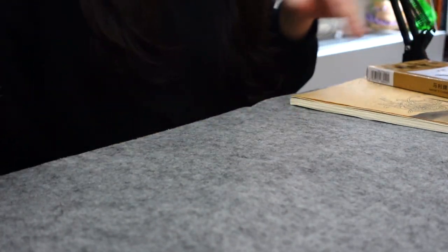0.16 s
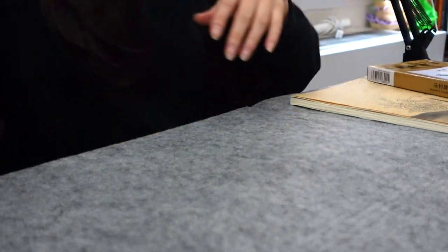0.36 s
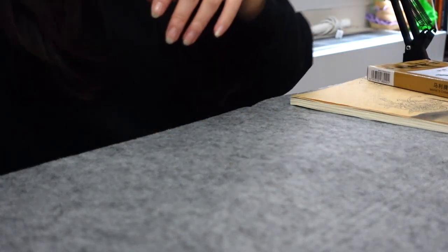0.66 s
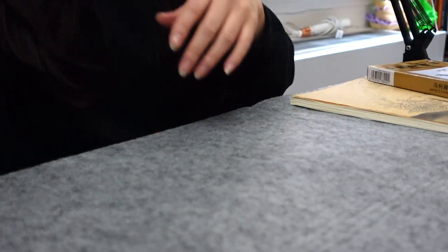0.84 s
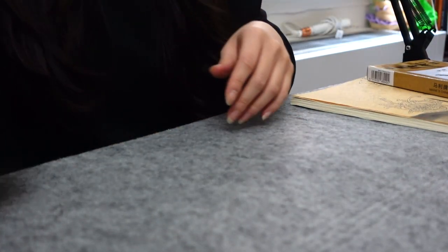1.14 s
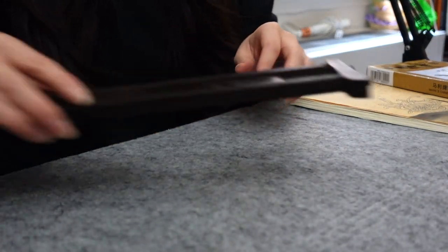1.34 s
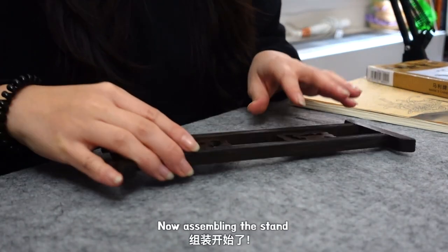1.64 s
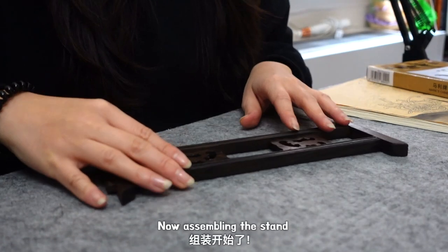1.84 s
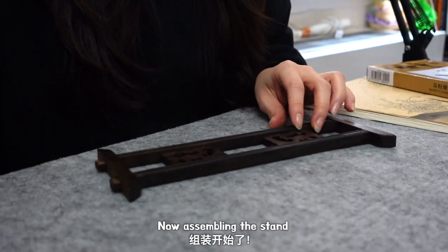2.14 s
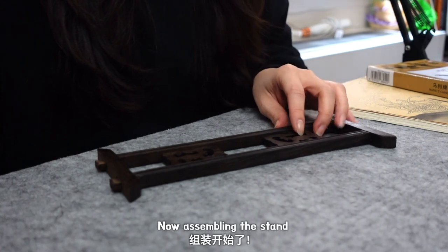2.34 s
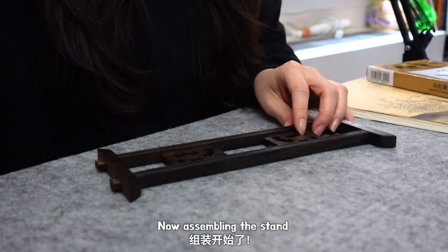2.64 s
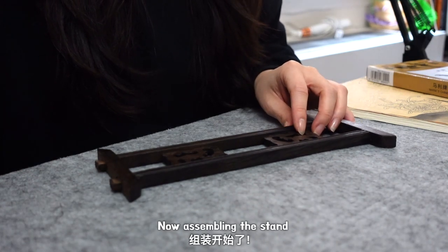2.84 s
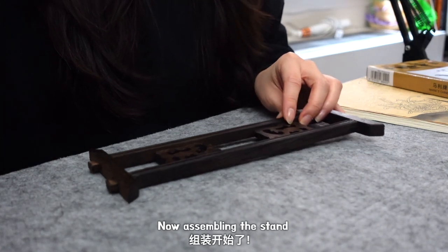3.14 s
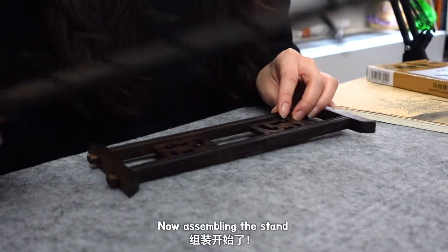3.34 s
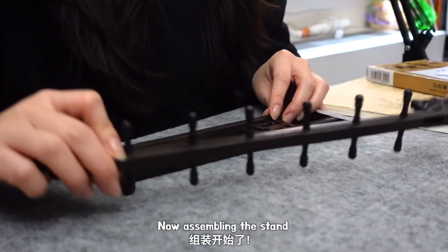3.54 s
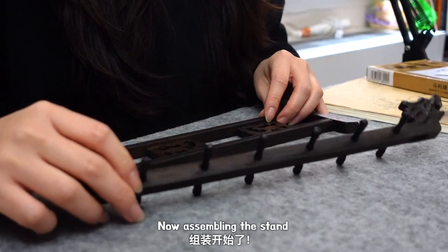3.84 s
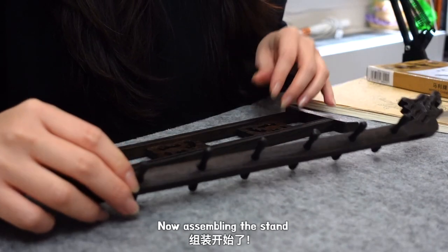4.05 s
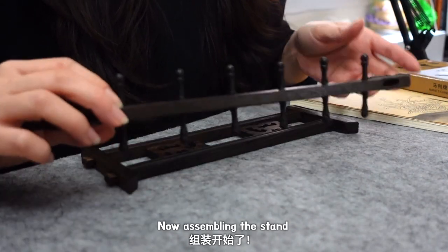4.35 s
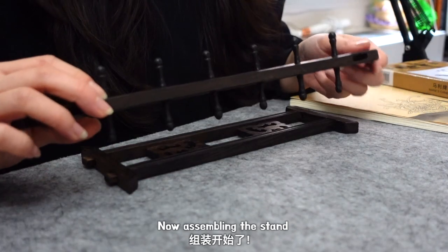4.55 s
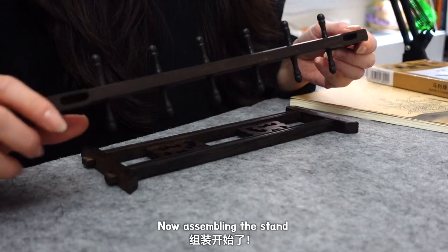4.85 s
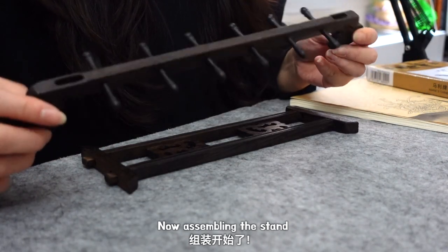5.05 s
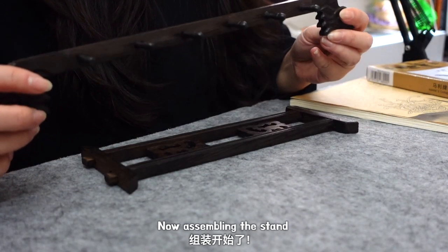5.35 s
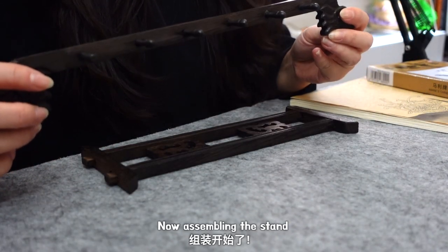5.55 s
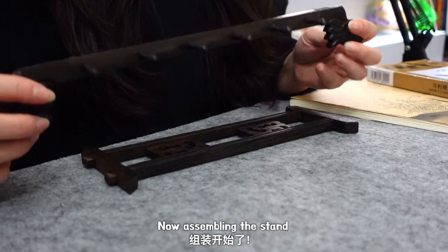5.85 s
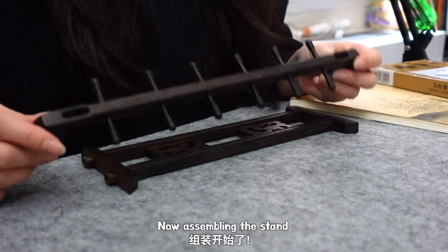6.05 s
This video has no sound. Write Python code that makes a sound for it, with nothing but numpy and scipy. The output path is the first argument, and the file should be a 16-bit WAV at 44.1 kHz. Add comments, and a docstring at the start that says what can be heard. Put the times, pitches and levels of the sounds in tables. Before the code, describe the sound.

Hands move wooden stand pieces on a padded tabletop near a stereo microphone. After a nearly silent start with a small knock on the left, thin wrapping crackles and dry ticks gather, then hard wooden knocks rattle in a quick cluster. Light taps and rustling follow. Later there are only isolated bright clicks and faint skin slips on a wooden bar, over soft low room hum with little echo.

```python
"""Over a quiet room hum a wooden tick is heard, then a pile of small wooden parts clatters aside.
Parts of a small stand are picked up and turned over on a felt-covered table, close to a stereo microphone.
Knocks and shifting parts make the wood ring; random small contacts make the rattle, the crinkle of
wrapping and the rub of fingers on a bar. Filtered noise and wavering tones make the room and its hum."""
import sys
import numpy as np
from scipy import signal
from scipy.fft import rfft, irfft
from scipy.io import wavfile
from scipy.ndimage import uniform_filter1d

SR = 44100
rng = np.random.default_rng(int(sys.argv[2]) if len(sys.argv) > 2 else 0)


def file_out(sig):
    """Save sig as 16-bit WAV at sys.argv[1]."""
    # one column per channel
    cols = np.atleast_2d(sig).T
    # limit, then scale
    lim = np.clip(cols, -1, 1)
    pcm = np.round(lim * 32767).astype(np.int16)
    wavfile.write(sys.argv[1], SR, pcm)


N = 273420
TIME = np.arange(N) / SR
TOP_HZ = 15900  # nothing is heard much above this
PORTS_HZ = 900  # below it both microphone ports hear nearly the same

# Ticks and knocks: start_s, peak_db (of the tick), centre_hz, ring_s (time to fall 60 dB),
# thud_db (over the tick), left_minus_right_db
KNOCK_LIST = [(0.121, -56, 2470, 0.052, -18, 1.2), (0.7785, -64, 2340, .021, 9, 18),
              (0.816, -43, 4070, 0.029, 5.5, 16), (0.9387, -68, 4240, 0.078, 5, 8),
              (1.6675, -48.5, 2950, 0.029, -3, -2), (1.6988, -51, 3420, .03, -13, -3),
              (1.9769, -36.5, 3100, 0.041, -27, -.6), (2.016, -31.5, 2940, 0.028, -28, -.6),
              (2.0446, -37, 3180, .025, -26, 3), (2.0826, -42, 4500, 0.016, -37, 1),
              (2.1022, -37, 3300, .03, -37, 1), (2.115, -37, 3800, 0.017, -27, 1),
              (2.3113, -50, 2690, 0.015, 9, -4), (2.3284, -47, 5060, .03, 0, 11),
              (2.3629, -22.5, 2270, 0.051, -17, 11.5), (2.387, -26.5, 5000, 0.11, 3, 9.5),
              (2.4205, -11.5, 3300, 0.017, -23, 12), (2.436, -31, 2723, 0.023, -8, -1),
              (2.4546, -14, 3240, .027, -14, 7), (2.4923, -16, 1596, 0.071, 2.5, 7),
              (2.5016, -19.5, 1690, .03, -10, 2.2), (2.5234, -24.5, 1580, 0.038, 8, 6),
              (2.5324, -32, 1565, 0.022, 2, 2), (2.5718, -28, 1500, .03, 8.5, 2),
              (2.5773, -30, 1650, .02, 5.5, 9), (2.6758, -25, 1950, 0.1, -13, 3),
              (2.8137, -40, 5580, 0.086, 9.5, 5), (2.8945, -36, 7000, .02, -15, 4),
              (2.9132, -30, 4220, 0.033, -24, 8), (2.9993, -39.5, 3460, 0.022, -19, -7),
              (3.025, -36.5, 6860, 0.018, -12, 4), (3.0406, -36.5, 3320, 0.015, -30, 9),
              (3.051, -33, 1520, 0.023, -10, -1.2), (3.085, -36.5, 3190, 0.017, -35, .6),
              (3.1581, -41.5, 3100, 0.019, -4, 4), (3.2452, -45, 3570, 0.014, -22, 12),
              (3.2802, -41.5, 3460, .05, -17, 3), (3.3058, -41, 5640, .022, -37, 8),
              (3.3155, -32, 3500, 0.032, -40, 6), (3.4162, -43, 4280, 0.037, -13, 3),
              (3.8105, -45.5, 3740, 0.017, -18, -0.5), (4.006, -51.5, 2900, 0.058, -23, -6),
              (4.0764, -51, 3700, 0.049, -23, -2.2), (4.1787, -46, 5000, .015, -15, -7),
              (4.2375, -31, 6470, .008, -27, 4), (4.2511, -28, 5800, 0.011, -19, -1.2),
              (4.364, -54, 3000, 0.029, -2, -11), (5.0331, -43.5, 3900, 0.041, -23, 4),
              (5.96, -49, 6370, 0.056, -22, 2)]
# Notes of the frame and table top: pitch_hz, level_db, ring_s (time to fall 60 dB)
FRAME_NOTES = [(85, -10.5, .08), (150, -15.5, .08), (219, 12, 0.027), (295, 8, 0.048), (433, 6, 0.045),
               (539, 1.5, 0.038), (596, -0.5, .06), (696, 0, 0.089), (817, -6.5, 0.088), (930, 0, 0.038),
               (1117, -0.5, .04), (1260, -11, 0.13), (1380, -12.5, .04), (1574, 7, 0.072)]
# Notes of the small parts: pitch_hz, level_db, ring_s (a knock brings its own ring time instead)
PEG_NOTES = [(2091, -2.5, 0.032), (2564, -2.5, 0.0477), (3290, -2, 0.039), (3962, -0.5, 0.058),
             (4244, -1, 0.057), (5170, -4, 0.019), (5670, 1.5, .04), (6070, -5.5, 0.05),
             (6610, -5.5, 0.054), (8540, -9, 0.09), (8860, -21.5, 0.048), (11200, -14.5, 0.026)]
# Notes of the held bar: pitch_hz, level_db, ring_s (a knock brings its own ring time instead)
BAR_NOTES = [(1065, -1, .06), (1900, 2, 0.089), (2910, -3, .02), (3530, -0.5, 0.022), (4060, -4.5, .03),
             (5080, -15.5, .035), (5510, 0.5, 0.047), (6350, 0, .025), (7230, -0.5, 0.031),
             (9570, 1, 0.014), (11900, -8, .02), (13200, -4, .02), (15400, -2.5, .015)]
BAR_LIFTED_S = 4.1  # knocks after this ring the bar
# A blow with this ring time covers this many octaves each way and has this crack level over its tone.
# Shorter rings are broader and crack less.
RING_S, SPREAD_OCTAVES, SPREAD_POWER = .03, 0.78, 0.76
CRACK_DB, CRACK_DB_PER_HALVING = 5.5, -2


def knocks():
    """Each blow: a crack, the notes near its centre (small parts, later the lifted bar), a thud in the frame."""
    out, t = np.zeros((2, N + 6000)), np.arange(6000) / SR
    noises = rng.standard_normal((len(KNOCK_LIST), 3, len(t)))
    frame_hz = bursts(SHIFTING_BURSTS)[1]  # the thud sounds where the frame is being shifted
    for (start_s, peak_db, hz, ring_s, thud_db, pan_db), noise in zip(KNOCK_LIST, noises):
        ring_s = max(ring_s, .004)
        start = int(start_s * SR)
        octaves = SPREAD_OCTAVES * (RING_S / ring_s) ** SPREAD_POWER
        crack_db = CRACK_DB + CRACK_DB_PER_HALVING * np.log2(RING_S / ring_s)
        edges = [hz * 2 ** -octaves, min(hz * 2 ** octaves, TOP_HZ)]

        band = signal.butter(2, edges, "band", fs=SR, output="sos")
        crack = signal.sosfilt(band, noise[0] * np.exp(-t / 0.0009))

        # notes far from the centre of the blow are weaker
        struck = BAR_NOTES if start_s > BAR_LIFTED_S else PEG_NOTES
        near = [(f, g - 6 * (np.log2(f / hz) / octaves) ** 2, ring_s) for f, g, _ in struck]
        low_pass = signal.butter(2, edges[1], fs=SR, output="sos")
        push = signal.sosfilt(low_pass, noise[1] * np.exp(-t / .0012))
        tone = ring(push, near)

        thud_hz = frame_hz[start]
        low = [(f, g - 5 * abs(np.log2(f / thud_hz)), low_s) for f, g, low_s in FRAME_NOTES]
        thud = ring(soft(noise[2] * np.exp(-t / .002)), low)

        tick = undb(crack_db) * crack / np.abs(crack).max() + tone / np.abs(tone).max()
        blow = tick / np.abs(tick).max() + undb(thud_db) * thud / np.abs(thud).max()
        out[:, start:start + len(t)] += pan(blow * undb(peak_db), pan_db)
    return out[:, :N]


# In every burst table the sound swells 20 dB up to its peak in rise_s.
# It then falls 20 dB in fall_s times the "lingers" setting of bursts().
# Parts shifting on the table: peak_s, level_db, rise_s, fall_s, centre_hz
SHIFTING_BURSTS = [(0.782, -50.5, 0.032, 0.085, 393), (0.822, -42.5, 0.014, 0.08, 602),
                   (0.955, -52.5, 0.049, 0.097, 290), (2.362, -40.5, 0.04, 0.07, 450),
                   (2.395, -31.5, 0.049, 0.075, 510), (2.45, -25.5, 0.057, 0.11, 554),
                   (2.494, -18.5, 0.041, .11, 660), (2.592, -31.5, .08, 0.094, 520),
                   (2.798, -45.5, .01, 0.033, 250), (2.82, -36.5, 0.011, 0.084, 330),
                   (3.055, -49, 0.011, 0.053, 1040), (4.254, -61, 0.0073, .05, 1133)]
# Boom of the whole table: pitch_hz, level_db, ring_s (time to fall 60 dB)
TABLE_NOTES = [(90, -4.5, 0.14), (120, 4.5, 0.091), (156, -4, 0.057)]
BOOM_DB, BOOM_LINGERS = -18, 1.6  # boom against the shifting; its fall time as a multiple of fall_s


def shifting():
    """Dull irregular bumps drive the low notes of the frame and boom on in the table."""
    gain, centre_hz = bursts(SHIFTING_BURSTS)
    boom_gain = undb(BOOM_DB) * bursts(SHIFTING_BURSTS, BOOM_LINGERS)[0]
    bumps = soft(grains(1200, 3.2))
    body = touched(bumps, FRAME_NOTES, centre_hz, octaves=0.55, patchy_db=6.5)
    boom = ring(bumps, TABLE_NOTES)
    return pan(unit(body) * gain + unit(boom) * boom_gain, .3)


# Small parts rattling in the pile: peak_s, level_db, rise_s, fall_s, left_minus_right_db, centre_hz,
# brightness_db (treble above 6920 Hz against the rest)
RATTLING_BURSTS = [(0.78, -64, 0.026, 0.1, 8, 3290, -7), (0.814, -65, 0.0043, 0.078, 15, 3250, -26),
                   (0.954, -72.5, .15, 0.1, 10, 4270, -2), (2.39, -40.5, 0.077, 0.026, 2.5, 3400, -9.5),
                   (2.418, -28, .005, 0.14, 1, 3350, -3.5), (2.466, -28, 0.051, 0.14, 2.5, 3330, -13.5),
                   (2.516, -35, 0.14, 0.052, -1.7, 2220, -17.5), (2.676, -40, .011, 0.05, 5, 2110, -9),
                   (2.812, -64.5, .08, 0.27, 12, 4690, -4)]


def rattling():
    """Dense little collisions ring the small parts over a scraping hiss; they lie spread across the table."""
    gain, pan_db, centre_hz, bright_db = bursts(RATTLING_BURSTS)
    parts = []
    for _ in range(2):
        touch = grains(2500, 1.1)
        hiss = colour(touch, [(1200, -34.5), (2000, 4), (7000, -1.0), (9000, -16.5), (16000, -28.0)])
        rings = touched(touch, PEG_NOTES, centre_hz, octaves=1.2, patchy_db=6.0)
        parts.append(brighten(unit(rings) + undb(3.5) * unit(hiss), 6920.0, bright_db))
    middle, spread = parts
    # the second layer has opposite sign left and right, which widens the sound
    wide = middle + undb(-13) * spread * np.array([[1], [-1]])
    return pan(wide * gain, pan_db)


# Wrapping crinkles: peak_s, level_db, rise_s, fall_s, brightness_db (above 7 kHz against below),
# left_minus_right_db
CRINKLING_BURSTS = [(1.668, -63, .012, .25, -10, 1.5), (1.79, -63, 0.07, 0.25, -10.5, 0.5),
                    (1.852, -64, .2, 0.06, -12, 0), (1.945, -54, 0.037, 0.24, -13.5, -2),
                    (2.046, -45, 0.12, .045, -9.5, -.6), (2.096, -42.5, 0.031, 0.049, -14.5, -2),
                    (2.22, -66.5, .2, .15, -5.5, 2), (2.914, -53, 0.022, 0.17, 1.5, 6),
                    (3.05, -48.5, 0.024, 0.14, -7, 1), (3.16, -67, 0.038, 0.055, 2, -3),
                    (3.318, -50.5, 0.033, .03, -6, -2), (3.32, -57.5, 0.3, 0.53, -7.5, 2),
                    (3.75, -68, 1.1, 0.39, -7.5, -1), (4.012, -67, 0.037, .15, -7, 1.5),
                    (4.076, -69, .012, 0.1, -16, 7), (6.186, -62.5, 0.018, .11, -8.5, 1)]
# Colour of the crinkle before its brightness is set: pitch_hz, level_db
WRAP_COLOUR = [(410, -29.5), (700, -26), (1230, -9), (1420, -9), (1800, -5), (2590, -9.5), (3240, -1.5),
               (3690, -5), (5330, -9.5), (11100, -21), (16000, -32.5)]


def crinkling():
    """Creases snap in quick succession, and each burst of snaps has its own brightness."""
    gain, bright_db, pan_db = bursts(CRINKLING_BURSTS)
    snaps = grains(5500, 2.85) * undb(1.5 * walk(49))
    crinkle = brighten(colour(snaps, WRAP_COLOUR), 7000., bright_db)
    return pan(crinkle * gain, pan_db)


# Fingers sliding along the bar: peak_s, level_db, rise_s, fall_s, centre_hz, hiss_db (over the ring)
RUBBING_BURSTS = [(0.684, -72.5, 0.79, 0.069, 2950, -10), (4.182, -65.5, 0.042, 0.039, 4000, -3),
                  (4.256, -56.5, .008, .035, 5700, 7), (4.28, -68.5, .03, .4, 5600, 3),
                  (4.36, -74, .04, .04, 5600, -9), (4.97, -77, 0.3, 0.17, 5570, -9.5),
                  (5.047, -56, 0.032, 0.063, 3900, -9.5), (5.792, -78, .06, 0.022, 4190, 0.8),
                  (5.965, -66, 0.14, 0.2, 6500, -7)]


def rubbing():
    """Skin slips along the bar and lets its thin notes sing along with the hiss of the slip."""
    gain, centre_hz, hiss_db = bursts(RUBBING_BURSTS)
    slips = grains(3800, 1.6) * undb(2.1 * walk(36))
    hiss = colour(slips, [(1500, -24.5), (3000, -4.0), (4500, -2.5), (16000, -11.0)])
    sung = touched(slips, BAR_NOTES, centre_hz, octaves=0.39, patchy_db=5.0)
    return pan((unit(sung) + undb(hiss_db) * unit(hiss)) * gain, .8)


# How long the room rings in each band: pitch_hz, ring_s (time to fall 60 dB)
ROOM_BANDS = [(300, 0.42), (1500, 0.17), (6000, 0.17)]
ROOM_DB = -10


def room(dry):
    """Echoes blur into a tail that differs left and right and lasts longest in the low notes."""
    t = np.arange(SR // 2) / SR
    tail = 0
    for hz, ring_s in ROOM_BANDS:
        band = signal.butter(1, [hz / 2.3, hz * 2.3], "band", fs=SR, output="sos")
        noise = signal.sosfilt(band, rng.standard_normal((2, len(t))))
        tail = tail + noise * 1000 ** (-t / ring_s)
    tail = tail * (1 - np.exp(-t / 0.0038))  # the echoes build up quickly
    # long waves reach both ports alike
    mid, side = tail
    side = signal.sosfilt(signal.butter(1, PORTS_HZ, "high", fs=SR, output="sos"), side)
    tail = np.array([mid + side, mid - side]) / np.sqrt(np.sum(tail ** 2))
    mono = dry.mean(axis=0, keepdims=True)
    return undb(ROOM_DB) * signal.fftconvolve(mono, tail, axes=1)[:, :N]


# Colour of the room tone in the centre: pitch_hz, level_db (relative)
AIR_MID_COLOUR = [(15, -76), (25, -61.5), (53, -13), (90, -11), (103, -14.5), (124, -2), (146, -11),
                  (202, -13), (313, -17), (726, -23), (1280, -25), (1780, -26), (4360, -33), (15200, -36.5),
                  (16500, -42)]
# Colour of the left-right difference in the room tone: pitch_hz, level_db (relative)
AIR_SIDE_COLOUR = [(15, -46.5), (25, -23), (43, -47.5), (80, -13), (114, -11.5), (226, -6), (388, -10.5),
                   (726, -8), (854, -12), (1030, -12), (4480, -22), (11300, -30), (16500, -50.5)]
AIR_MID_DB, AIR_SIDE_DB = -66, -68.5
# Narrow drones of an appliance: pitch_hz, width_hz, level_db
DRONES = [(202.6, 37, -70.5), (389.6, 17, -79), (694, 98, -75)]
# Swells of a wavering low tone: peak_s, level_db, rise_s, fall_s, pitch_hz
SECOND_HUM_BURSTS = [(5.174, -67.5, .2, .15, 228.2), (5.56, -71.5, .25, .7, 231.5),
                     (6.2, -68, 2.5, .6, 250.3)]
LOW_HUM_HZ, LOW_HUM_DB = 119.2, -66  # both wander around these values


def air():
    """Shaped noise makes the room tone; narrow noise bands and two wavering sine tones hum in it."""
    mid = unit(colour(rng.standard_normal(N), AIR_MID_COLOUR)) * undb(AIR_MID_DB)
    side = unit(colour(rng.standard_normal(N), AIR_SIDE_COLOUR)) * undb(AIR_SIDE_DB)
    for hz, width_hz, db in DRONES:
        drone = signal.lfilter(*signal.iirpeak(hz, hz / width_hz, SR), rng.standard_normal(N))
        mid = mid + undb(db) * unit(drone)
    low_gain = undb(LOW_HUM_DB + 3.1 * walk(7.9))
    mid = mid + low_gain * tone_at(LOW_HUM_HZ + 1.37 * walk(3.1))
    gain, hz = bursts(SECOND_HUM_BURSTS)
    second_gain = gain * undb(4.0 * walk(21))
    mid = mid + second_gain * tone_at(hz + 8.1 * walk(14))
    return np.array([mid + side, mid - side])


def tone_at(hz):
    """A sine wave that follows a moving pitch, at an rms level near 1."""
    return np.sqrt(2) * np.sin(2 * np.pi * np.cumsum(hz) / SR)


def bursts(table, lingers=0.84):
    """Summed gain of the bursts, then their further columns, weighted towards whichever bursts sound loudest."""
    peak_s, level_db, rise_s, fall_s, *columns = np.transpose(table)[:, :, None]
    coarse = TIME[::32]  # slow curves need few points
    late = coarse - peak_s
    drop = np.where(late < 0, -late / rise_s, late / (fall_s * lingers))  # in steps of 20 dB
    power = undb(2 * np.maximum(level_db - 20 * drop, -200))
    total = power.sum(axis=0)
    curves = [np.sqrt(total)]
    for column in columns:
        curves.append((power * column).sum(axis=0) / total)
    return [np.interp(TIME, coarse, curve) for curve in curves]


def grains(rate, spread_db):
    """Random contacts, "rate" of them a second on average: mostly small, now and then a larger one."""
    hit = rng.random(N) < rate / SR
    size = np.minimum(rng.exponential(size=N), 5)
    return hit * rng.choice([-1, 1], N) * undb(spread_db * size)


def walk(rate):
    """A wandering value around 0: about "rate" random levels a second, joined by straight slopes."""
    k = int(SR / rate)
    return uniform_filter1d(np.repeat(rng.standard_normal(N // k + 1), k), k)[:N]


def ring(x, notes):
    """Excite ringing notes that die away, each scaled for its level under steady rubbing."""
    out = 0
    for hz, db, ring_s in notes:
        r, w = 1000 ** (-1 / (ring_s * SR)), 2 * np.pi * hz / SR
        note = signal.lfilter([1, 0, -1], [1, -2 * r * np.cos(w), r * r], x)
        out = out + undb(db) * np.sqrt(1 - r) * note
    return out


def touched(x, notes, centre_hz, octaves, patchy_db):
    """Like ring, but the contact moves: it favours the notes near its centre and feeds each unevenly."""
    out, power = 0, 0
    for note in notes:
        hz, db, _ = note
        gain = undb(-6 * np.abs(np.log2(hz / centre_hz)) / octaves)
        power = power + (gain * undb(db)) ** 2
        out = out + gain * undb(patchy_db * walk(25)) * ring(x, [note])
    return out / np.sqrt(power)


def soft(x):
    """A cushioned contact pushes longer and so darker: felt excites little above 1900 Hz."""
    return signal.sosfilt(signal.butter(2, 1900, fs=SR, output="sos"), x)


def colour(x, table):
    """Shape a sound by (pitch_hz, level_db) points."""
    hz, db = np.transpose(table)
    bins = np.maximum(np.fft.rfftfreq(len(x), 1 / SR), 1)
    return irfft(rfft(x) * undb(np.interp(np.log(bins), np.log(hz), db)), len(x))


def brighten(x, hz, bright_db):
    """Set the level above hz against the level below."""
    low = signal.sosfiltfilt(signal.butter(4, hz, fs=SR, output="sos"), x)
    return unit(low) + unit(x - low) * undb(bright_db)


def pan(x, db):
    """Place a sound by its left minus right level; long waves stay in the centre."""
    short = signal.sosfilt(signal.butter(1, PORTS_HZ, "high", fs=SR, output="sos"), x)
    sides = undb(np.array([db / 2, -db / 2]).reshape(2, -1))
    return x + short * (sides - 1)


def undb(db):
    """Turn a level in dB into a gain."""
    return 10 ** (np.asarray(db) / 20)


def unit(x):
    """Scale a sound to an rms level of 1."""
    return x / np.sqrt(np.mean(x ** 2))


def scene():
    """The handling with its room, over the room tone."""
    dry = shifting() + rattling() + crinkling() + rubbing() + knocks()
    return dry + room(dry) + air()


def record(dry):
    """The microphone drops the deepest bass (below 62 Hz); the recorder cuts the top."""
    heard = signal.sosfilt(signal.butter(2, 62, "high", fs=SR, output="sos"), dry)
    return signal.sosfilt(signal.ellip(10, .2, 70, TOP_HZ, fs=SR, output="sos"), heard)


dry = scene()
out = record(dry)
file_out(out)
```